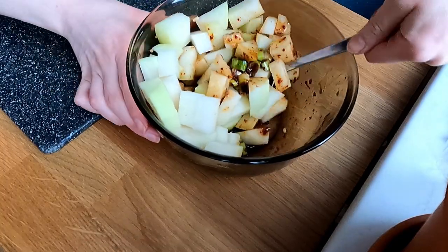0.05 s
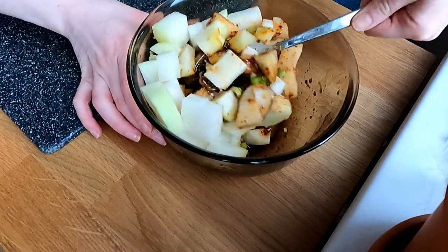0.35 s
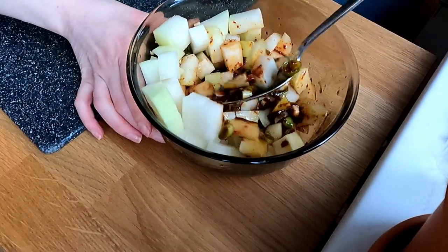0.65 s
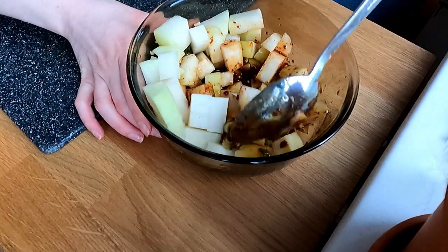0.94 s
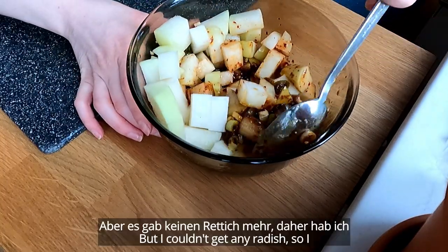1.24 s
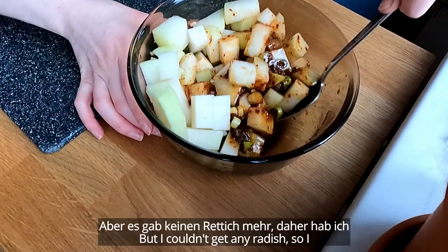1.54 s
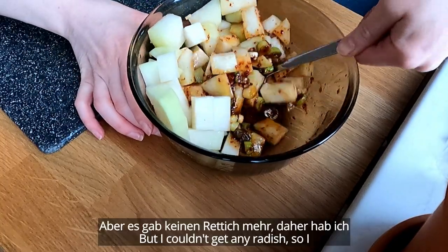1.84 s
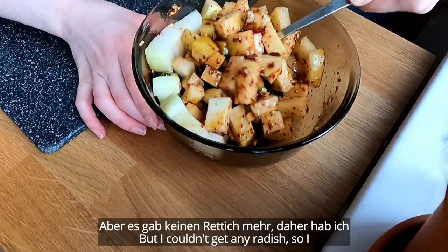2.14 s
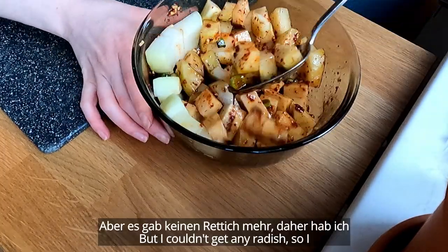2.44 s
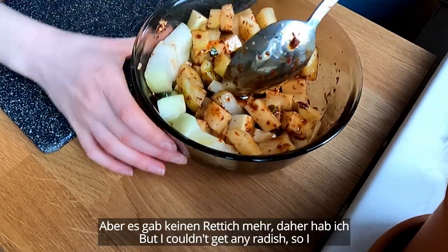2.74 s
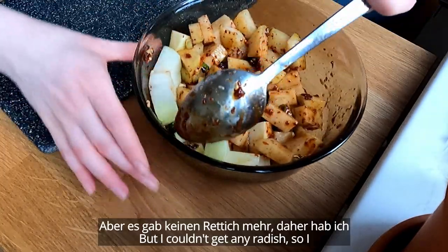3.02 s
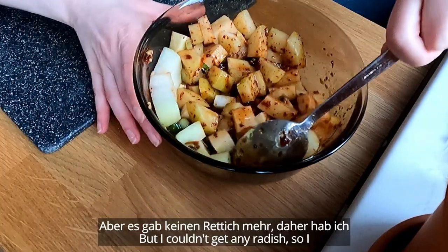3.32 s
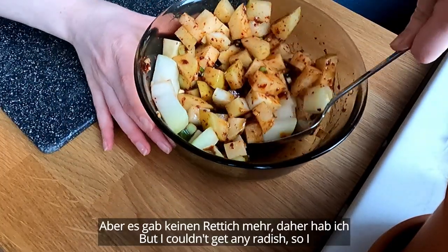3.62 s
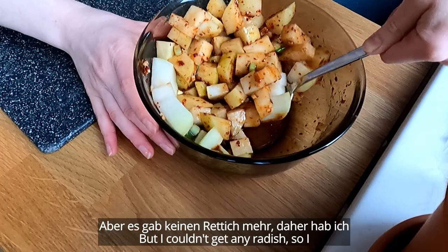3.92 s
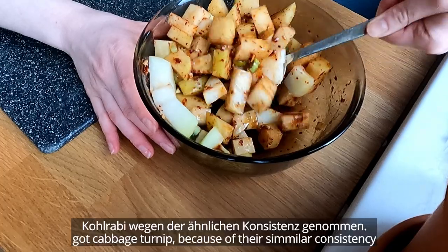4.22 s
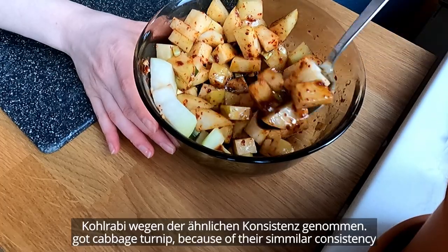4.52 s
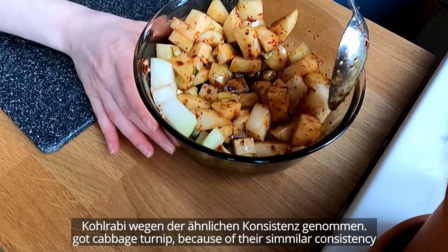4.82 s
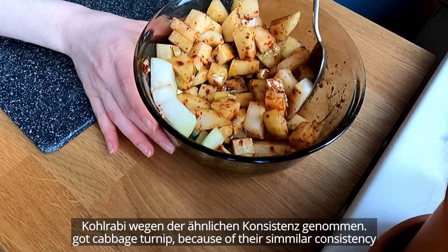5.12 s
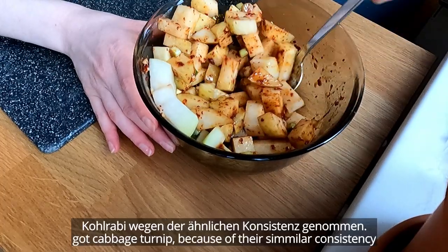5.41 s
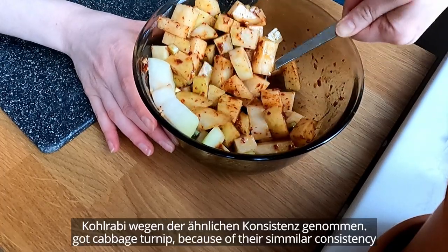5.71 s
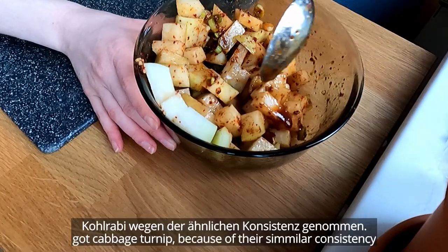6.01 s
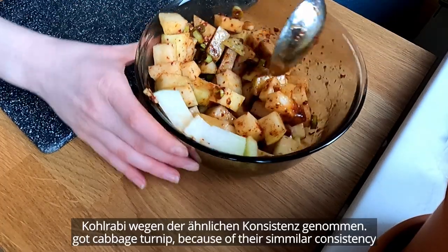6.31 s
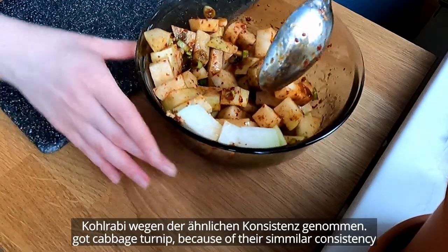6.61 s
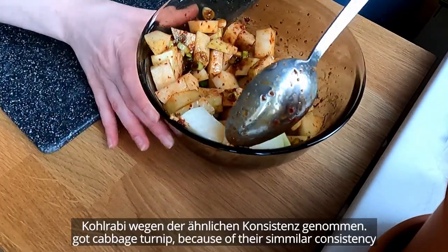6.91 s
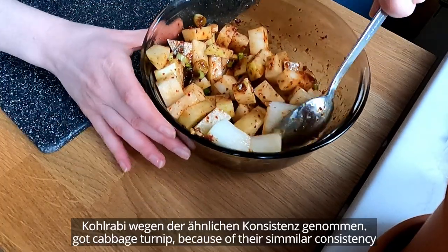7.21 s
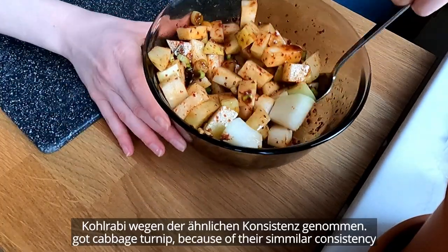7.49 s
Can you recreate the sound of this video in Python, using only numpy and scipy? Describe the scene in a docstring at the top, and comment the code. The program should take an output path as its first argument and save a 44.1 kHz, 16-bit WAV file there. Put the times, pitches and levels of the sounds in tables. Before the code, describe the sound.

A steel spoon stirs sauced vegetable cubes in a glass bowl on a wooden table, straight ahead of the microphone in a quiet, slightly reverberant kitchen. Throughout, the cubes tumble with soft low bumps, small wet smacks and brief crackles. The spoon clinks on the glass at about 0.2 seconds, then several times between 1.4 and 2 seconds, each short ring carrying a dull thud through the table. A faint squeak follows at 2.1. Around 3 seconds the bowl rubs softly on the wood as it turns. A firm knock comes at 3.5, the bowl rocks just after, and lighter clinks follow until 4.2. The hardest clink lands at 5.2, trailed by smaller taps and another rocking thud. The bowl rocks and turns again around 6.3 to 6.7. A bright clink at 7, a duller knock at 7.3 and a faint squeak at 7.5 finish the stirring.

```python
"""Sauced vegetable cubes tumble and squelch as a steel spoon stirs them in a glass bowl.
The spoon clinks on the glass, which the food damps, and each knock thuds through the wooden table.
Twice the spoon skids and squeaks; now and then a hand turns the bowl, which rubs on the wood.
Behind it all is the low hush of a quiet kitchen."""
import sys
import numpy as np
from scipy import signal
from scipy.fft import rfft, irfft, next_fast_len
from scipy.io import wavfile
from scipy.ndimage import uniform_filter1d

SR = 44100
rng = np.random.default_rng(int(sys.argv[2]) if len(sys.argv) > 2 else 0)


def master(y):
    """Save y as 16-bit WAV."""
    cut = np.clip(np.atleast_2d(y).T, -1, 1)
    pcm = np.round(cut * 32767)  # scale
    wavfile.write(sys.argv[1], SR, pcm.astype(np.int16))


N = 332955
TIME = np.arange(N) / SR
AGE = TIME[:2 * SR // 5]   # s since a blow


def from_db(db):
    """Decibels to gain."""
    return 10 ** (np.asarray(db) / 20)


def unit_rms(x):
    """Scale to rms 1."""
    return x / np.sqrt(np.mean(x ** 2) + 1e-20)


def unit_blow(x):
    """Scale to the energy of 10 ms at rms 1."""
    return x / np.sqrt(np.sum(x ** 2) / (SR / 100) + 1e-20)


def add(track, t, sound):
    """Mix a sound into the track from t seconds."""
    at = int(round(t * SR))
    part = sound[max(-at, 0):max(N - at, 0)]
    track[max(at, 0):max(at, 0) + len(part)] += part


def butter(x, hz, kind, order=2):
    """Butterworth filter."""
    sos = signal.butter(order, np.clip(hz, 10, .45 * SR), kind, fs=SR, output="sos")
    return signal.sosfilt(sos, x + 1e-18)


def coloured(x, spectrum):
    """Filter by a curve of (f/Hz, level/dB) points; rms 1."""
    hz, db = np.transpose(spectrum)
    size = next_fast_len(N)
    bins_hz = np.maximum(np.fft.rfftfreq(size, 1 / SR), 1)
    gain = from_db(np.interp(np.log(bins_hz), np.log(hz), db))
    return unit_rms(irfft(rfft(x, size) * gain, size)[:N])


def decay(age, t60):
    """Envelope falling 60 dB in t60 seconds."""
    return np.exp(-np.log(1000) * age / t60)


def struck(modes):
    """One blow on modes (f/Hz, level/dB, t60/s); the contact point varies each mode's share."""
    hz, db, t60 = np.transpose(modes)
    shares = from_db(db + rng.standard_normal(hz.shape)) * rng.choice([-1, 1], hz.shape) / np.sqrt(t60)
    out = np.zeros(len(AGE))
    for mode_hz, mode_t60, gain in zip(hz, t60, shares):
        age = AGE[:int(2 * mode_t60 * SR)]
        out[:len(age)] += gain * decay(age, mode_t60) * np.sin(2 * np.pi * mode_hz * age)
    return unit_blow(out)


def burst(t60):
    """Decaying white noise."""
    return rng.standard_normal(len(AGE)) * decay(AGE, t60)


def grains(per_s, spread_db, size=N):
    """Random tiny contacts of uneven strength."""
    strength = from_db(spread_db * np.minimum(rng.exponential(1, size), 4)) * rng.choice([-1, 1], size)
    return strength * (rng.random(size) < per_s / SR)


# table top modes: f/Hz, level/dB, t60/s
TABLE_MODES = [(48.4, -21.5, .3), (79.1, -5.5, 0.08), (105, -13, 0.17), (164, 0, 0.06), (190, 0, 0.038),
               (272.9, -2.5, 0.27), (307.5, -6.5, 0.077), (430, -13.5, 0.031), (488.2, -14, 0.096),
               (563, -13.5, 0.074), (659.4, -14.5, 0.085)]


def table_blow(scatter=.03):
    """The table top rings, slightly differently each time, with a hollow among its low modes."""
    modes = [(hz * rng.normal(1, scatter), db, t60) for hz, db, t60 in TABLE_MODES]
    return unit_blow(butter(struck(modes), [112, 142], "bandstop", order=1))


def cube_bumps():
    """Soft cubes land at one spot and excite only the table's low modes."""
    body = butter(butter(table_blow(), 340, "low", order=6), 35, "high")
    return signal.oaconvolve(grains(per_s=120, spread_db=3), body)[:N]


def surge(start_s, hold_s, attack_s, release_s):
    """Envelope that is full by start_s, holds, then dies away."""
    age = TIME - start_s
    return np.clip(age / attack_s + 1, 0, 1) * np.exp(-np.maximum(age - hold_s, 0) / release_s)


# spoonfuls tipped down the heap: t/s, length/s, level/dB
SPOONFULS = [(0.0, 0.28, -49), (0.6, 0.1, -43.5), (2.42, 0.22, -48.5), (3.6, 0.17, -54),
             (4.35, 0.32, -50.5), (5.55, 0.21, -48.5), (5.89, 0.15, -51)]


def tumbling(trim_db=-1.5, stir_db=-60.5, jolt_db=-50.5, turn_db=-5, attack_s=.028):
    """The heap bumps at two spots, set off by stirring, turns, spoonfuls and spoon blows."""
    bumps = unit_rms(cube_bumps() + cube_bumps())
    spills = [from_db(db) * surge(t, length_s, attack_s, release_s=.19) for t, length_s, db in SPOONFULS]
    jolts = [from_db(jolt_db + .31 * force_db) * surge(t + attack_s, 0, attack_s, release_s=.17)
             for t, force_db, *_ in SPOON_BLOWS]
    causes = [from_db(stir_db), from_db(turn_db) * turn_envelope(), *spills, *jolts]
    return from_db(trim_db) * np.sqrt(sum(cause ** 2 for cause in causes)) * bumps


# still kitchen spectrum: f/Hz, level/dB
AIR_SPECTRUM = [(15, -30.5), (30, -8.5), (49, 1), (60, -10), (80, -7.5), (125, -9.5), (170, -2),
                (290, -3.5), (400, -11.5), (700, -32), (1250, -29), (3000, -38), (7500, -34.5),
                (11500, -51.5), (15000, -60.5)]


def room_air(level_db=-58.5):
    """Steady low hush of the kitchen."""
    return from_db(level_db) * coloured(rng.standard_normal(N), AIR_SPECTRUM)


# loudest short ticks (wet smacks, light spoon taps and a dull knock): t/s, level/dB, f/Hz
TICKS = [(0.0303, -35, 1560), (0.0685, -34, 1715), (0.347, -37.5, 3870), (0.701, -30.5, 1765),
         (0.9327, -42.5, 4800), (0.995, -43, 7200), (1.924, -39, 1740), (2.7433, -45.5, 1740),
         (3.8418, -28.5, 2280), (4.6442, -38, 3290), (5.3445, -27, 1590), (5.704, -43, 1790),
         (5.8164, -37.5, 4053), (6.2135, -51.5, 5140)]


def ticks(trim_db=-14, t60=.021, ring_db=-4, faint_per_s=4, faint_db=-58.5, faint_hz=(2500, 8000)):
    """Short snaps, each with a brief ring; fainter ones come at random."""
    out = np.zeros(N)
    faint = [(when * N / SR, faint_db + 4 * (2 * size - 1), np.interp(pitch, [0, 1], faint_hz))
             for when, size, pitch in rng.random((int(faint_per_s * N / SR), 3))]
    for t, db, hz in TICKS + faint:
        snap = unit_blow(butter(burst(t60), [hz * .78, hz * 1.4], "band", order=1))
        ring = from_db(ring_db) * struck([(hz, 0, t60)])
        add(out, t, from_db(db + trim_db) * unit_blow(snap + ring))
    return out


# spoon strokes through the food: mid t/s, half length/s, level/dB, f/Hz
DRAGS = [(0.044, 0.06, -53.5, 4200), (0.699, 0.016, -49, 4470), (0.958, 0.056, -63.5, 5900),
         (1.227, .025, -61, 6850), (1.283, .018, -62, 3460), (1.392, 0.031, -59, 2960),
         (2.631, 0.1, -69, 5100), (3.699, 0.04, -51, 2460), (4.293, 0.032, -48, 2930),
         (4.616, 0.016, -57.5, 5510), (5.591, 0.13, -51, 3260)]


def drags(glass_ring, trim_db=-2, glass_db=-3, width_oct=1.1):
    """The dragging spoon crackles and faintly rings the glass."""
    out, offset_s = np.zeros(N), AGE - AGE.mean()
    for t, half_s, db, hz in DRAGS:
        crackle = unit_rms(grains(per_s=4100, spread_db=7.5, size=len(AGE)))
        ringing = unit_rms(signal.fftconvolve(crackle, glass_ring)[:len(AGE)])
        band_hz = hz * 2 ** (width_oct * np.array([-.5, .5]))
        stroke = unit_rms(butter(crackle + from_db(glass_db) * ringing, band_hz, "band", order=1))
        add(out, t - AGE.mean(), from_db(db + trim_db) * stroke * np.exp(-(offset_s / half_s) ** 2))
    return out


def stirring():
    """The small sounds of stirring: ticks and drags, band-limited."""
    glass_ring = struck(GLASS_MODES)
    mix = ticks() + drags(glass_ring)
    return butter(butter(mix, 1100, "high", order=3), 6800, "low")


# heaviest cubes dropping back: t/s, level/dB
DROPS = [(0.075, -32), (0.145, -19.5), (0.628, -27), (1.932, -29), (2.509, -27), (3.521, -20),
         (4.203, -26.5), (4.365, -27), (4.566, -26), (4.635, -30), (5.948, -29.5), (6.052, -30.5)]
# bowl rocking on the wood: t/s, thud level/dB, clack level/dB
ROCKS = [(3.667, -17, -34.5), (5.339, -22.5, -38), (6.33, -22.5, -43)]
# bowl foot modes: f/Hz, level/dB, t60/s
FOOT_MODES = [(419, 1.5, 0.23), (467, -25, .05), (596.6, 5.5, 0.047), (823, 1.5, 0.021), (1005, 1.5, 0.015),
              (1500, -12, .02)]


def thuds(knock_db=-1, drop_db=-11, topple_db=-5, topple_s=.028, rock_db=-7, clack_db=-1, lag_s=.002):
    """Spoon knocks, cubes that land and topple, and the rocking bowl shake the table top."""
    out = np.zeros(N)
    for t, _, db, *_ in SPOON_BLOWS:
        add(out, t + lag_s, from_db(db + knock_db) * butter(table_blow(), 85, "high"))
    for t, db in DROPS:
        for delay_s, bump_db in ((0, 0), (topple_s * rng.uniform(.44, 2), topple_db)):
            soft_bump = unit_blow(butter(table_blow(), 320, "low", order=6))
            add(out, t + delay_s, from_db(db + drop_db + bump_db) * soft_bump)
    for t, db, foot_db in ROCKS:
        thud = from_db(db + rock_db) * butter(table_blow(), 150, "high")
        clack = from_db(foot_db + clack_db) * struck(FOOT_MODES)
        add(out, t + 2 * lag_s, thud + clack)
    return butter(butter(out, 2400, "low"), 28, "high")


def swell(clink, length_s, level_db=-8, rise_s=.0074):
    """The brief, thinner swell that leads into a clink."""
    age = AGE[:round(length_s * SR)]
    fade = rng.standard_normal(len(age)) * np.exp(-age / rise_s)
    thin = butter(butter(clink[:len(age)], 8000, "low", order=4), 1700, "high", order=1)
    lead = signal.fftconvolve(thin, fade[::-1] / np.sqrt(np.sum(fade ** 2)))
    return from_db(level_db) * lead[:len(age)]


def singing(db, hz, t60=.15, split=.016):
    """The uneven bowl splits a wall mode into a beating pair that outlasts the knock."""
    return from_db(db) * struck([(hz * (1 - split / 2), 0, t60), (hz * (1 + split / 2), -3, t60)])


# bowl and spoon modes: f/Hz, level/dB, t60 at the rim/s
GLASS_MODES = [(1047, 1.5, .03), (1206, -0.5, 0.017), (1340, -4.5, 0.0064), (1543, 1.5, 0.055),
               (1604, -7, 0.023), (1730, -2.5, 0.0043), (1930, -8, 0.019), (2384, 2, 0.0028),
               (2748, -8, 0.082), (2980, -12.5, 0.039), (3110, -11.5, 0.0045), (3437, -7.5, 0.045),
               (3690, -2, 0.011), (4004, -3, 0.051), (4210, -3.5, 0.11), (4080, -9, 0.59),
               (4350, -10, 0.13), (4210, -16.5, 0.024), (5520, -10.5, 0.05), (5230, -8.5, 0.039),
               (5893, -3.5, 0.032), (5590, -5, 0.044), (5670, -10.5, 0.14), (6100, -9, .025),
               (6206, -10, .015), (6655, -20.5, 0.0055), (7580, -2.5, 0.011), (7650, -1, 0.086),
               (7790, -8, 0.057), (8370, -8.5, 0.043), (9960, -5, 0.0083)]
# leading knock, clack, clink and upper modes: level/dB, t60 at the rim/s
LEAD_MODES = [(4, .011), (7, .018), (6, .045), (4, .035)]
# edges of the knock, clack, clink, upper and top registers: f/Hz
REGISTER_EDGES_HZ = [800, 2000, 3850, 4800, 7000, 10000]
# a harder blow is a shorter contact, so treble grows fastest
# rows knock, clack, top, crack: level at a medium blow/dB, slope/(dB per dB of force)
FORCE_LAW = [(-30, 1.18), (-25.5, 1.02), (-38.5, 2.01), (-53.5, 2.35)]
# spoon on glass: t/s, force re medium/dB, thud level/dB, knock-to-clack tilt/dB,
# height (0 floor, 1 rim), clack f/Hz, clink f/Hz, clink level/dB, upper level/dB
SPOON_BLOWS = [(0.1683, 1, -23.5, -4.5, 1, 2004, 4240, -19, -28.5),
               (0.43, -14, -42.5, -2, .75, 2012, 4100, -40.5, -53.5),
               (1.4334, 1.5, -18.5, -0.5, 0.07, 3530, 4150, -43.5, -26.5),
               (1.617, 0, -28, 3, 1, 2380, 4290, -24.5, -23),
               (1.65, -6.5, -30, .5, 0.6, 3000, 4360, -32, -41),
               (2.0016, -2, -28.5, 0, 0.89, 2860, 4210, -31.5, -35.5),
               (3.201, -4, -40, -0.5, 0.94, 2800, 4080, -25, -31.5),
               (3.4577, 6, -21, -1, 0, 2440, 4140, -33.5, -21),
               (3.7889, -5.5, -33.5, 1.5, 0.54, 3410, 4200, -36, -35.5),
               (4.156, -5.5, -30.5, -2, 0.88, 3880, 4244, -28.5, -34),
               (5.1686, 7.5, -18.5, -1, 0.2, 2470, 4183, -19, -19),
               (5.4401, -3.5, -29, 6.5, .88, 3320, 4400, -31, -30),
               (5.48, -5.5, -35, 0.5, 0.7, 3010, 4305, -39, -46),
               (5.7334, -5, -37.5, -1.5, 0.81, 2660, 4215, -36.5, -42),
               (7.001, 1.5, -34, -2.5, .6, 2034, 4190, -20, -21.5),
               (7.3241, 3, -26, -1, .05, 3480, 3880, -38, -27)]


def clinks(crack_trim_db=12, glass_trim_db=-1, detune=.003, swell_s=.05):
    """Steel strikes glass; lower down, against the food, the ring is deeper, shorter and grittier."""
    out = np.zeros(N)
    for t, force_db, _, tilt_db, height, clack_hz, clink_hz, clink_db, upper_db in SPOON_BLOWS:
        knock_db, clack_db, top_db, crack_db = (db + slope * force_db for db, slope in FORCE_LAW)
        levels_db = [knock_db - tilt_db, clack_db + tilt_db, clink_db, upper_db, top_db]
        knock_hz = np.interp(height, [0, 1], [1220, 1700])
        upper_hz = np.interp(height, [0, 1], [5340, 5990])
        t60_scale = np.interp(height, [0, 1], [.73, 1])
        grit_db = np.interp(height, [0, 1], [-3.5, -10])
        leads_hz = [knock_hz, clack_hz, clink_hz, upper_hz]
        modes = GLASS_MODES + [(hz, db, t60) for hz, (db, t60) in zip(leads_hz, LEAD_MODES)]
        clink = from_db(crack_db + crack_trim_db) * unit_blow(butter(burst(t60=.014), 7300, "high"))
        for low, high, level_db in zip(REGISTER_EDGES_HZ, REGISTER_EDGES_HZ[1:], levels_db):
            ring = struck([(hz * rng.normal(1, detune), db, t60 * t60_scale)
                           for hz, db, t60 in modes if low <= hz < high])
            grit = unit_blow(butter(burst(t60=.02), [low, high], "band", order=3))   # steel chatters
            clink += from_db(level_db + glass_trim_db) * unit_blow(ring + from_db(grit_db) * grit)
        clink = butter(clink, .7 * knock_hz, "high")   # glass radiates little below the knock
        add(out, t - swell_s, np.concatenate([swell(clink, swell_s), clink]))
        add(out, t, singing(clink_db - 5.5, clink_hz) + singing(upper_db - 10.5, upper_hz))
    return out


# spoon skids on bare glass: mid t/s, half length/s, level/dB, f/Hz
SQUEAKS = [(2.138, 0.022, -46, 4130), (7.486, 0.074, -49, 3490)]


def squeaks(rise_hz_per_s=2910, waver_depth_hz=197, waver_rate_hz=350):
    """Steel sticks and slips: an unsteady tone that climbs as the spoon slides up the wall."""
    out, offset_s = np.zeros(N), AGE - AGE.mean()
    for t, half_s, db, hz in SQUEAKS:
        waver = unit_rms(butter(rng.standard_normal(len(AGE)), waver_rate_hz, "low"))
        pitch_hz = hz + rise_hz_per_s * offset_s + waver_depth_hz * waver
        tone = np.sin(2 * np.pi * np.cumsum(pitch_hz) / SR)
        add(out, t - AGE.mean(), from_db(db) * tone * np.exp(-(offset_s / half_s) ** 2))
    return out


# turns of the bowl: t/s, length/s, full-speed level/dB
TURNS = [(2.599, 0.57, -44), (6.184, 0.56, -45), (7.144, 0.16, -52.5)]


def turn_envelope(rise_power=3.44, fall_power=2.37):
    """Gain following the bowl's speed: each push builds slowly and stops sooner."""
    out = np.zeros(N)
    for t, length_s, db in TURNS:
        progress = np.clip((TIME - t) / length_s, 0, 1)
        push = progress ** rise_power * (1 - progress) ** fall_power
        out += from_db(db) * push / push.max()
    return out


# glass rubbing on wood: f/Hz, level/dB
RUB_SPECTRUM = [(88, -42), (150, -22.5), (264, -2), (366, -16.5), (489, -14), (601, -14), (655, -10),
                (861, -22), (1040, -16), (1190, -25), (2210, -29), (2490, -32.5), (5770, -43.5),
                (9000, -53.5), (11700, -71), (19800, -120)]


def turning(trim_db=1):
    """The glass foot slips over the wood grain in dense tiny catches."""
    catches = grains(per_s=3100, spread_db=-.5)
    return from_db(trim_db) * turn_envelope() * coloured(catches, RUB_SPECTRUM)


# kitchen reverberation: f/Hz, t60/s, level/dB
REVERB_BANDS = [(80, 0.92, -8.5), (250, 0.43, -2.5), (620, 0.45, -1), (1320, 0.68, -5.5), (2580, 0.5, -7.5),
                (4200, .55, -12), (6950, 0.37, -7), (12800, 0.42, -4)]


def kitchen(x, build_s=.0057):
    """Direct sound plus a diffuse tail that builds quickly and dies band by band."""
    age, edges_hz = TIME[:SR], np.geomspace(40, 16000, 15)
    hz, t60s, dbs = np.transpose(REVERB_BANDS)
    white, tail = rng.standard_normal((2, SR)), 0
    build = 1 - np.exp(-age / build_s)
    for k, (low, high) in enumerate(zip(edges_hz, edges_hz[1:])):
        t60, db = (np.interp(np.log(low * high) / 2, np.log(hz), column) for column in (t60s, dbs))
        band = butter(white[k % 2], [low, high], "band") * decay(age, t60) * build
        tail = tail + from_db(db) * band * np.sqrt(2 * (high - low) / SR / np.sum(band ** 2))
    return x + signal.fftconvolve(x, tail)[:N]


def scene(mute_s=(5.845, 6.2)):
    """Everything happens at the bowl, straight ahead of one microphone."""
    bright = kitchen(clinks() + stirring() + squeaks())
    sounding = (TIME < mute_s[0]) | (TIME > mute_s[1])   # one ring stops short
    gate = uniform_filter1d(1.0 * sounding, size=200)
    dull = kitchen(thuds()) + tumbling() + turning()
    return np.tile(bright * gate + dull + room_air(), (2, 1))


def record(dry, ceiling=.7, dull_hz=8400, cutoff_hz=15750):
    """The hardest peaks are rounded; little of the top octave remains, mostly on the right."""
    rounded = ceiling * np.tanh(dry / ceiling)
    body = butter(rounded, dull_hz, "low", order=6)
    top = from_db([[-23], [-12]]) * butter(rounded, [12000, 14500], "band", order=3)
    return signal.sosfilt(signal.ellip(10, .1, 80, cutoff_hz, fs=SR, output="sos"), body + top)


dry = scene()
out = record(dry)
master(out)
```